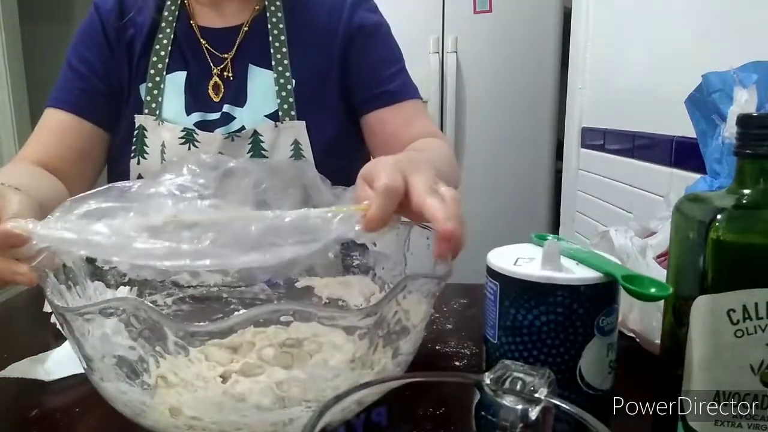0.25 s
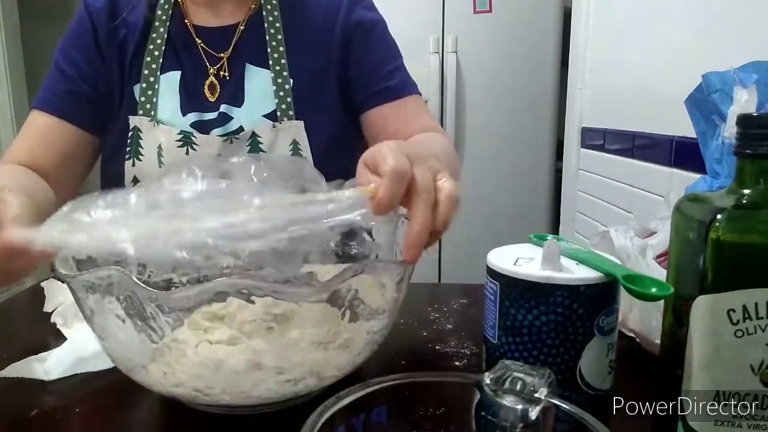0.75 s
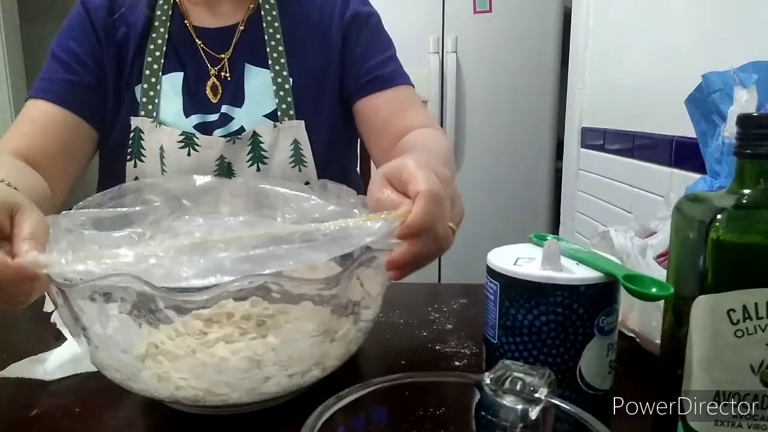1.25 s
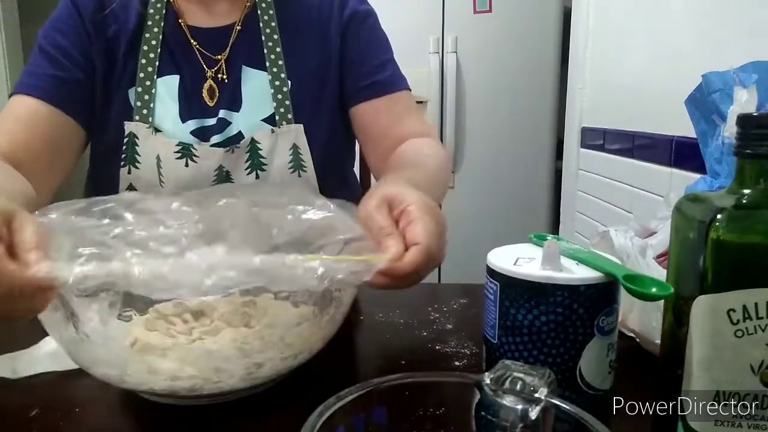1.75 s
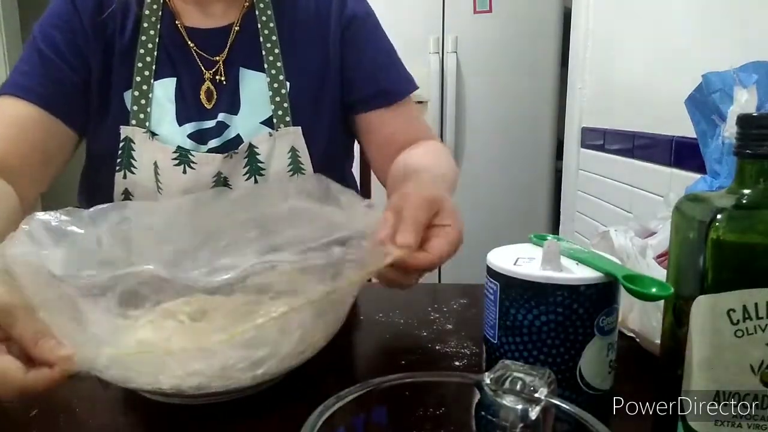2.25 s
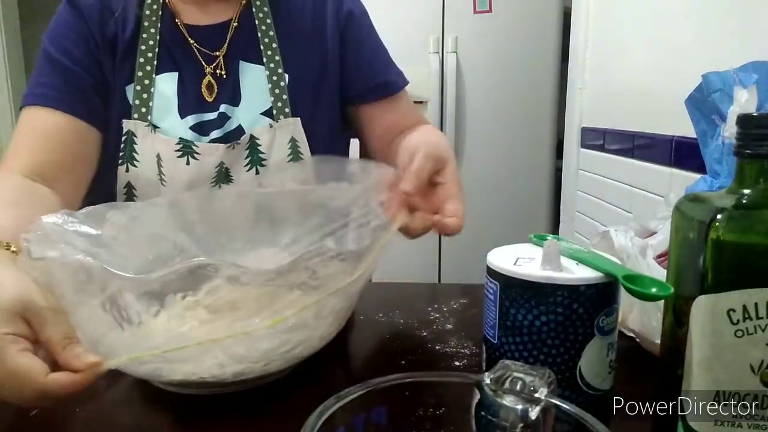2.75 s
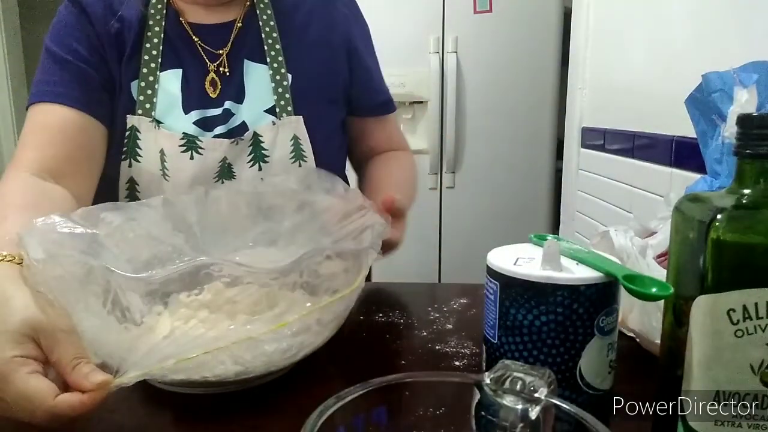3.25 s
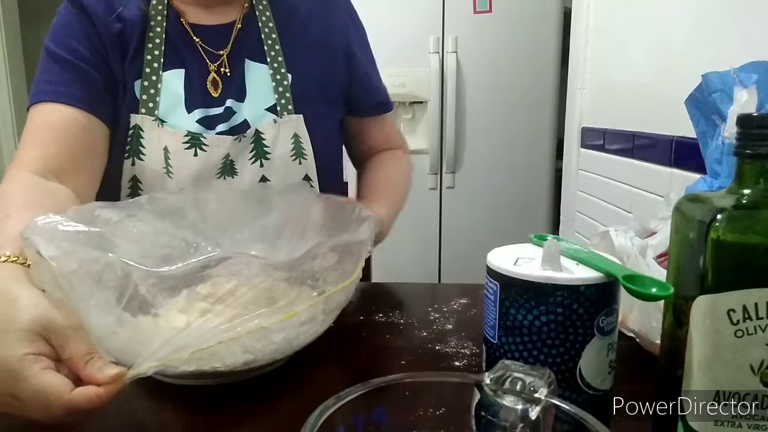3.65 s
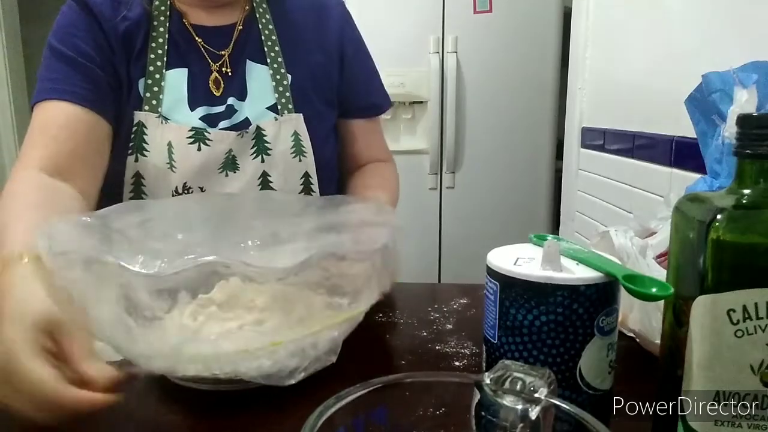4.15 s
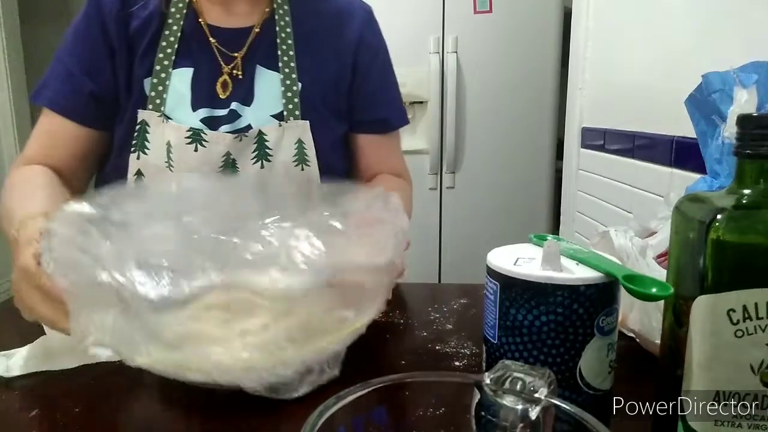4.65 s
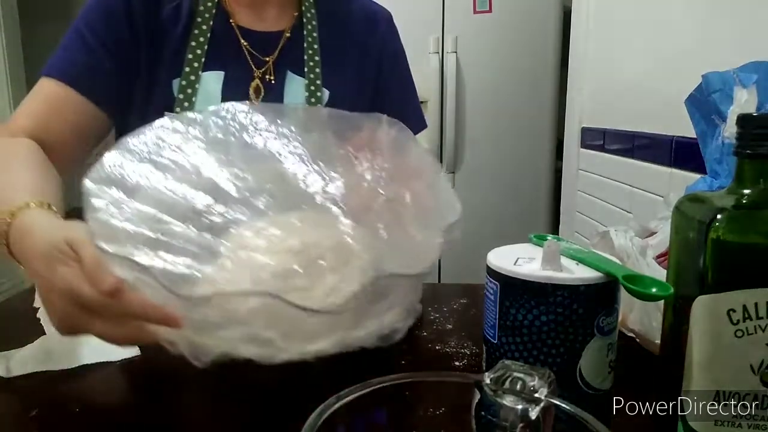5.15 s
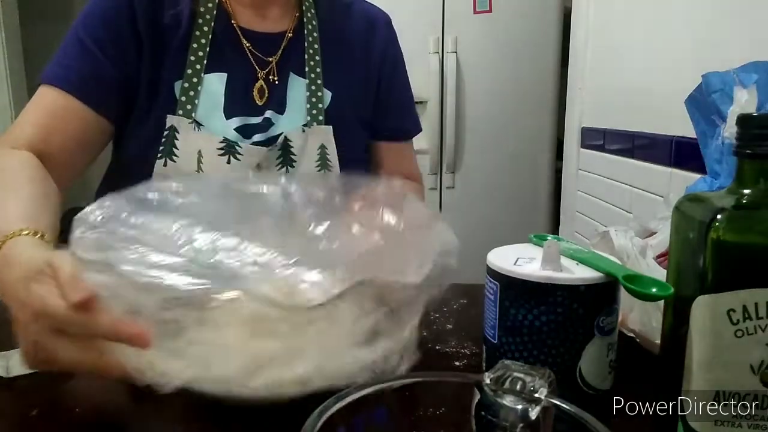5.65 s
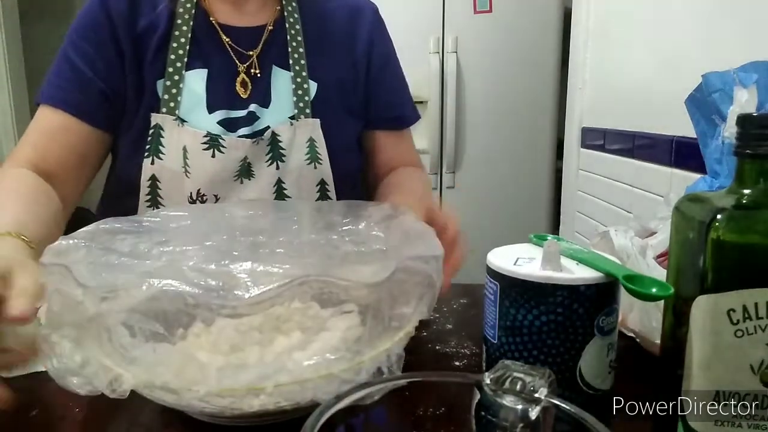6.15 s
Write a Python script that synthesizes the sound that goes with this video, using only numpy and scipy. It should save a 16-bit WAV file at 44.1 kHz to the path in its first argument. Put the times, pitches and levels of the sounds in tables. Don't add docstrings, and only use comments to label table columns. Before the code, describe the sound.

Thin plastic film crinkles and snaps as it is stretched over a glass bowl, with table bumps, three booming set-downs and a faint refrigerator hum.

```python
import sys
import numpy as np
from scipy import signal
from scipy.fft import rfft, irfft, next_fast_len
from scipy.io import wavfile
from scipy.ndimage import uniform_filter1d

SR = 44100
rng = np.random.default_rng(int(sys.argv[2]) if len(sys.argv) > 2 else 0)


def to_linear_factor(level_db):
    exponent = np.asarray(level_db, float) / 20
    return 10 ** exponent


def to_wav(s):
    ch = np.atleast_2d(s).T
    pcm = np.round(np.clip(ch, -1, 1) * 32767)
    wavfile.write(sys.argv[1], SR, pcm.astype(np.int16))


N = 282681
SIZE = next_fast_len(N + SR)
HZ = np.maximum(np.fft.rfftfreq(SIZE, 1 / SR), 1)
BOOM_HZ = 122.9


def rms_one(x):
    return x / np.sqrt(np.mean(x ** 2) + 1e-20)


def in_time(rows):
    s, *columns = np.transpose(rows)
    return [np.interp(np.arange(N) / SR, s, c) for c in columns]


def at_hz(points, hz):
    table_hz, values = np.transpose(points)
    return np.interp(np.log(hz), np.log(table_hz), values)


def colour(x, spectrum):
    shaped = rfft(x, SIZE) * to_linear_factor(at_hz(spectrum, HZ))
    return rms_one(irfft(shaped, SIZE)[..., :N])


def band(x, low_hz, high_hz):
    edges = [low_hz, min(high_hz, 0.45 * SR)]
    return signal.sosfilt(signal.butter(2, edges, "band", fs=SR, output="sos"), x)


def drift(rate_hz):
    r = np.exp(-2 * np.pi * rate_hz / SR)
    return rms_one(signal.lfilter([1], [1, -2 * r, r * r], rng.standard_normal(N + SR))[SR:])


def ring(clicks, hz, t60):
    r, w = to_linear_factor(-60 / (t60 * SR)), 2 * np.pi * hz / SR
    return signal.lfilter([0, np.sin(w)], [1, -2 * r * np.cos(w), r * r], clicks + 1e-18)


def grains(per_s, spread_db, clump_db, clump_hz):
    sizes = to_linear_factor(spread_db * np.minimum(rng.exponential(1, N), 5))
    signs = rng.choice([-1, 1], (2, N))
    happens = rng.random(N) < per_s / SR
    return sizes * signs * happens * to_linear_factor(clump_db * drift(clump_hz))


def add(track, s, sound):
    i = round(s * SR)
    track[..., i:i + sound.shape[-1]] += sound[..., :N - i]


def burst(sound, rise_s, t60):
    t = np.arange(sound.shape[-1]) / SR
    return sound * np.minimum(t / rise_s, 1) * to_linear_factor(-60 * t / t60)


def summed(*levels_db):
    return 10 * np.log10(sum(to_linear_factor(2 * np.maximum(db, -200)) for db in levels_db))


def swell(s, db, rise_s, fall_s):
    t = np.arange(0, N, 32) / SR - s
    return db - 10 * np.where(t < 0, -t / max(rise_s, 0.002), t / max(fall_s, 0.002))


# (f/Hz, t60/s)
ROOM_DECAY = [(100, 0.21), (500, 0.32), (2000, 0.63), (6000, 0.18), (15000, 0.21)]


def tail(wet_db):
    t, out = np.arange(SR // 2) / SR, 0
    for low in 60 * 2.0 ** np.arange(8):
        dying = band(rng.standard_normal(len(t)), low, 2 * low) * np.minimum(t / 0.004, 1)
        dying = dying * to_linear_factor(-60 * t / at_hz(ROOM_DECAY, 1.4 * low))
        out = out + dying / np.sqrt(np.sum(dying ** 2)) * np.sqrt(low / SR * 2)
    return rfft(to_linear_factor(wet_db) * out, SIZE)


# (f/Hz, level/dB per Hz)
RUMBLE_SPECTRUM = [(30, -24), (60, 10.5), (120, -5), (230, 1), (400, -2), (520, -15), (700, -49.5),
                   (3000, -51), (8000, -65), (11500, -48.5), (15500, -54)]


def room_rumble(rub_db):
    rumble_db = summed(-60, rub_db - 16)
    return to_linear_factor(rumble_db + 4.5 + 1.3 * drift(2.8)) * colour(rng.standard_normal((2, N)), RUMBLE_SPECTRUM)


# (t/s, level/dB)
HUM_LEVEL = [(0, -65.5), (.3, -61), (.6, -64), (1.25, -62), (1.6, -64.5), (2.8, -62.5), (3.1, -59.5),
             (3.98, -62.5), (4.39, -66), (4.64, -60), (5.7, -61.5), (6.41, -59.5)]
# (f/Hz, level/dB under the hum)
CABINET_TONES = [(226, -16.5), (240, -18), (290, -15), (343, -16.5)]


def fridge():
    hum_hz = 113.1
    hum_db, = in_time(HUM_LEVEL)
    phase = 2 * np.pi * np.cumsum(hum_hz + 0.6 * drift(3.0)) / SR
    hum = np.sqrt(2) * np.sin(phase) * to_linear_factor(hum_db + 14.0 + 1.2 * drift(9.3))
    for hz, db in CABINET_TONES:
        hum = hum + np.sin(phase * hz / hum_hz) * to_linear_factor(hum_db + 13.5 + db + 3.0 * drift(5.7))
    return hum


# (t/s, level/dB, f/Hz, t60/s)
TABLE_BOOMS = [
    (1.1218, -19.5, 123.7, 0.54),
    (5.836, -17, 123.9, 0.68),
    (6.0594, -21, 124, 0.47),
]


def booms():
    out, t = np.zeros(N), np.arange(SR // 2) / SR
    thump = to_linear_factor(8) * burst(np.sin(2 * np.pi * 133.4 * t), 0.012, 0.09)
    for s, db, hz, t60 in TABLE_BOOMS:
        add(out, s, to_linear_factor(db) * (burst(np.sin(2 * np.pi * hz * t), 0.011, t60) + thump))
    return out


def rubbed_boom(rub_db):
    return to_linear_factor(rub_db - 7.5) * rms_one(ring(rng.standard_normal(N), BOOM_HZ, 0.3))


# (f/Hz, t60/s, level/dB in the first, second, third set-down)
TABLE_MODES = [(150.16, .15, -7, -4, -26), (190.4, 0.12, -7, -4, -8), (210, 0.27, -11, 3, -14),
               (287.7, 0.28, -11, -8, -6), (330, .3, -14, -20, -12), (344, 0.14, -6, -6.5, -5),
               (381, 0.2, -12.5, -11.5, -11), (431, .06, -7, -13, 6), (463, 0.071, 0.5, -9, 0),
               (492, 0.028, 3, -4, -3), (540, 0.27, -7, -15, -12), (590, 0.12, -12, -4, -4),
               (700, 0.27, -19, -19, -15), (793, 0.085, -11, -22, -27), (856, 0.19, -13, -22, -17),
               (885, 0.15, -16.5, -20, -12), (942, 0.1, -10.5, -30, -14), (1070, 0.21, -18, -26, -12),
               (1206, 0.11, -28, -31, -33), (1540, 0.11, -19.5, -31, -30), (2530, .2, -20, -29, -25),
               (3000, .25, -23, -31, -21), (3360, 0.16, -13, -31, -38)]


def rubbing(rub_db):
    clicks, rubbed = grains(900, 4.67, 2.6, 22)[0], 0
    for hz, t60, *_ in TABLE_MODES:
        if 150 < hz < 1300:
            rubbed = ring(clicks, hz, 0.36 * t60) * to_linear_factor(-7 * np.log2(hz / 200)) - rubbed
    return to_linear_factor(rub_db + 0.5) * rms_one(rubbed)


# (t/s, blow level/dB, contact hardness f/Hz, crack level/dB)
SET_DOWNS = [
    [(1.117, -15, 870, -17), (1.116, -45, 980, -15.5), (1.1255, -48.5, 700, -22.5)],
    [(5.8346, -17, 900, -25), (5.846, -34, 496, -43), (5.9, -41, 503, -55)],
    [(6.0538, -17.5, 800, -25), (6.0527, -43, 710, -28), (6.07, -41, 510, -40), (6.11, -37, 650, -55)],
]
# (low edge f/Hz, level/dB, t60/s)
CLATTER_BANDS = [(196, -16.5, 0.4), (406, -15, 0.28), (812, -21.5, 0.25), (1606, -26.5, 0.14),
                 (3190, -46, .12)]


def set_downs():
    out, blows = np.zeros(N), np.zeros((len(SET_DOWNS), N))
    for blow, contacts in zip(blows, SET_DOWNS):
        for s, db, hard_hz, crack_db in contacts:
            push = np.hanning(max(round(SR / hard_hz), 3))
            add(blow, s, to_linear_factor(db) * push / push.sum())
            crack = rms_one(band(rng.standard_normal(1500), 1300, 3230))
            add(out, s, to_linear_factor(crack_db) * burst(crack, 0.0008, 0.01))
            for hz, level_db, t60 in CLATTER_BANDS:
                clatter = rms_one(band(rng.standard_normal(SR // 3), hz, 2 * hz))
                add(out, s, to_linear_factor(db + level_db + 1.5) * burst(clatter, 0.5 / hz, t60))
    for hz, t60, *strength_db in TABLE_MODES:
        out += ring(to_linear_factor(strength_db) @ blows, hz, t60)
    return out


# (t/s, peak level/dB, pitch f/Hz, table boom level/dB)
SOFT_BUMPS = [(0.022, -45.5, 452, -15), (0.785, -44.5, 463, -0.5), (1.798, -48, 503, -2),
              (2.174, -38.5, 518, -32), (2.21, -41, 252, -24), (2.353, -36, 271, -14),
              (2.54, -32, 437, -10.5), (3.005, -31, 452, -14), (3.04, -26.5, 557, -32),
              (3.256, -39, 447, -14), (3.406, -38.5, 397, -25), (3.461, -43, 466, -19),
              (3.49, -35.5, 392, -10), (3.508, -26.5, 474, -10), (3.716, -38.5, 600, -12),
              (3.754, -33, 408, -8.5), (3.948, -37, 450, -8.5), (4.319, -39, 590, -38),
              (5.602, -53, 520, -11)]


def thuds():
    out, t = np.zeros(N), np.arange(9000) / SR
    boom = burst(np.sin(2 * np.pi * BOOM_HZ * t), 0.01, 0.34)
    for s, db, hz, boom_db in SOFT_BUMPS:
        tone = np.sin(2 * np.pi * hz * t)
        tone += 0.26 * np.sin(2 * np.pi * 0.99 * hz * t)
        tone += 0.5 * np.sin(2 * np.pi * 0.608 * hz * t)
        add(out, s, to_linear_factor(db + 6.5) * (burst(tone, 0.0013, 0.047) + to_linear_factor(boom_db + 2.5) * boom))
    return out


# (t/s, peak level/dB, share of its low, middle, high ring level/dB)
JUDDER_HITS = [(0.164, -33, -2.5, -23, -13), (0.222, -31, -23, 0, -19), (0.242, -26.5, -14, -8, -4),
               (0.255, -27.5, -29, -3, -1.5), (0.269, -29.5, -3.5, -2.5, -22),
               (0.285, -27.5, -7.5, -5, -11), (0.338, -27.5, -6, -8, -11), (0.369, -38, -23, 0, -8),
               (0.425, -45.5, -12, -3, 0.5), (0.469, -45.5, 8, -24, -25), (0.485, -35, 0.5, -16, -23)]
# (f/Hz, t60/s)
JUDDER_TONES = [(210, 0.22), (462, 0.12), (725, 0.13)]


def judder():
    out, t = np.zeros(N), np.arange(9000) / SR
    for s, db, *share_db in JUDDER_HITS:
        for (hz, t60), part_db in zip(JUDDER_TONES, share_db):
            add(out, s, to_linear_factor(db + part_db + 1.5) * burst(np.sin(2 * np.pi * hz * t), 0.0028, t60))
    return out


# (t/s, steady crinkle level/dB, slackness as broad folds over fine creases level/dB)
STEADY_WORK = [(0, -63.5, 2.5), (.44, -71.5, 8), (.67, -71, -8.5), (.78, -56.5, 2.5), (1.13, -61, 1),
               (1.22, -55.5, 0.5), (1.96, -59, 0), (2.3, -52.5, -2), (2.55, -51, -8.5), (2.71, -63, -4.5),
               (2.82, -54, -1.5), (3.7, -57, 1), (3.82, -62.5, 5), (3.93, -59, -1.5), (4.41, -63, 2),
               (4.6, -60, 0), (4.8, -63, -12), (4.93, -58.5, -16), (5.03, -60, -9.5), (5.15, -70.5, -9.5),
               (5.3, -94.5, -9)]
# (peak t/s, peak level/dB, rise in s per 10 dB, fall in s per 10 dB)
FILM_TUGS = [(0.019, -55.5, .03, 0.06), (.25, -51.5, 0, 0.07), (.355, -52.5, .12, 0.02),
             (.215, -54, 0.06, .1), (.285, -53.5, 0.04, 0.04), (.688, -66, 0, .3),
             (1.02, -52.5, 0.16, 0.03), (1.62, -56, 0.17, 0), (1.82, -50.5, 0.08, 0.17),
             (2.14, -50, 0.19, 0.39), (2.177, -39.5, 0.01, 0.11), (2.541, -40, 0.0037, 0.02),
             (3.0, -49.5, 0.13, 0.44), (3.07, -40, 0, 0.01), (3.272, -47, 0.11, 0.01),
             (3.499, -46.5, 0.02, 0.05), (3.65, -54.5, -0.46, 0.14), (3.718, -47, -0.03, 0.03),
             (4.121, -44.5, 0.15, 0.1436), (4.302, -36.5, .008, 0.0057), (4.325, -44.5, 0.02, 0.0554),
             (4.462, -53.5, -0.03, 0.13), (4.55, -53.5, 0.02, 0.05), (4.749, -53, 0.3, 0.1),
             (5.345, -72.5, .01, -0.04), (5.392, -71.5, -0.03, 0.02), (5.555, -76.5, -0.02, 0.0354),
             (5.64, -67, -0.08, -0.5), (5.709, -59, 0.07, 0.11), (5.84, -64, -0.28, 0.08),
             (6.155, -61, 0.04, 0.23), (6.19, -55, 0.0268, 0.04), (6.23, -50, 0.042, 0.1),
             (6.301, -49.5, -0.35, 0.02), (6.33, -66, .01, 0.12)]
# (peak t/s, peak level/dB, rise in s per 10 dB, fall in s per 10 dB)
BOWL_DRAGS = [(.1, -55.5, 0.5, 0.3), (.25, -40, 0.09, 0.19), (.36, -54, 0.3, 0.13),
              (.785, -47.5, 0.14, 0.2), (1.09, -47, 0.08, 0.13), (1.16, -35, 0, 0.006),
              (1.2, -47, 0.04, 0.26), (1.85, -60, 0.5, 4), (2.16, -45, 0.07, -0.02), (2.33, -49, 0.07, 0.5),
              (2.551, -39.5, -0.1, 0.06), (2.8, -51.5, 0.2, 0.6), (3.039, -36, -0.03, 0.08),
              (3.28, -42.5, 0.07, 0.04), (3.5, -37.5, 0.02, 0.11), (3.73, -41.5, -0.15, 0.1),
              (4.14, -44.5, 0.05, 0.11), (4.38, -53.5, -1, 0.6), (4.78, -56, -0.5, 0.07),
              (4.97, -57, .1, .1), (5.71, -49, 0.13, 0), (5.86, -44.5, 0.05, 0.2), (6.06, -55, -0.1, 0.3),
              (6.299, -50, -0.14, 0.3)]


def handling():
    work_db, slack_db = np.array(in_time(STEADY_WORK))[:, ::32]
    tugs = [swell(*row) for row in FILM_TUGS]
    folds = [tug - 0.36 * max(row[1] + 51.5, 0) for tug, row in zip(tugs, FILM_TUGS)]
    shakes = [swell(s + 0.028, db - 33.5, 0.015, 0.066) for (s, db, *_), *_ in SET_DOWNS]
    crinkle_db = summed(work_db, *tugs)
    folds_db = summed(work_db + slack_db, *folds, *shakes) - crinkle_db
    rub_db = summed(*[swell(*row) for row in BOWL_DRAGS])
    return [np.interp(np.arange(N), np.arange(0, N, 32), db) for db in (crinkle_db, folds_db, rub_db)]


# (t/s, level/dB, low f/Hz, high f/Hz, t60/s)
LOOSE_FLAPS = [
    (5.3025, -59, 2800, 4200, 0.08),
    (5.335, -66, 2820, 3720, 0.21),
    (5.388, -69, 5200, 5700, .2),
    (5.585, -60, 885, 944, 0.69),
    (5.6, -60.5, 500, 1105, 0.24),
    (5.6, -75, 2920, 3700, .5),
    (4.33, -42.5, 970, 1290, 0.46),
]


def flaps():
    out = np.zeros((2, N))
    for s, db, low_hz, high_hz, t60 in LOOSE_FLAPS:
        even, ragged = rng.standard_normal((2, 2, 11000))
        crackle = rms_one(band(even * to_linear_factor(2.9 * ragged), low_hz, high_hz))
        add(out, s, to_linear_factor(db) * burst(crackle, 0.0011, t60))
    return out


# (t/s, level/dB, f/Hz, length in s)
FILM_SQUEAKS = [
    (2.245, -34, 2880, 0.012),
    (5.201, -70, 930, 0.046),
    (5.322, -71, 918, 0.03),
]


def squeaks():
    out = np.zeros(N)
    for s, db, hz, length_s in FILM_SQUEAKS:
        t = np.arange(round(length_s * SR)) / SR
        add(out, s, to_linear_factor(db) * np.sin(2 * np.pi * hz * t) * np.sin(np.pi * t / length_s) ** 0.5)
    return out


def patchy(x, low_hz, patchy_db):
    edges = low_hz * 2 ** np.arange(0, 3.1, 0.6)
    parts = [band(x, low, high) for low, high in zip(edges, edges[1:])]
    return x + sum(part * (to_linear_factor(patchy_db * drift(14)) - 1) for part in parts)


# (f/Hz, level/dB per Hz)
FINE_CREASES = [(2500, -3), (4000, -1.5), (6000, -3.5), (8500, -9), (10000, -5.5), (11500, 2.5),
                (13500, -5.5), (15500, -5)]
# (f/Hz, level/dB per Hz)
BROAD_FOLDS = [(300, 9.5), (700, 4), (1300, -3), (2000, 2), (2800, -2), (3800, -5.5), (5000, -9),
               (7000, -24.5)]


def crinkle(crinkle_db, folds_db):
    fine = patchy(colour(grains(4000, 2.3, 2.2, 40), FINE_CREASES), 1990, patchy_db=2.5)
    broad = patchy(colour(grains(4000, 1.6, 1.8, 23), BROAD_FOLDS), 498, patchy_db=2.5)
    clicks, dealt = grains(800, 1.9, 2.9, 21.5), rng.integers(0, 12, N)
    pops = 0
    for k, hz in enumerate(np.geomspace(2400, 12500, 12)):
        pops = pops + ring(clicks * (dealt == k), hz, 14 / hz) * np.sqrt(hz)
    out = to_linear_factor(crinkle_db + 6.0) * fine
    out += to_linear_factor(crinkle_db + folds_db + 5.5) * broad
    return out + to_linear_factor(crinkle_db - 4.0) * rms_one(pops)


# (t/s, peak level/dB, low share level/dB, middle share level/dB)
FILM_SNAPS = [(0.018, -27, -14.5, -17), (0.244, -22.5, -2.5, -28), (0.285, -35, 9, -10),
              (1.01, -26, -13, -27), (1.624, -26.5, -10, -9), (1.9345, -27, -11, -9.5),
              (2.174, -18.5, -14, -6), (2.353, -24, -6.5, -23.5), (2.4235, -25.5, -8.5, -8),
              (2.5388, -17, -8, -41.5), (2.9927, -23.5, -5, -18), (3.0418, -23, -3, -6),
              (3.494, -24, -13, -8), (3.511, -32, 9, -5), (3.717, -30, -20, -10), (4.299, -23, -11.5, -6),
              (4.321, -12, -6, -41), (4.4603, -31, -1.5, -3), (5.301, -66, -20, 11),
              (5.3896, -49, -14.5, -17), (6.297, -27.5, -15, -20)]
# (t/s, peak level/dB)
CREASE_TICKS = [(0.4995, -39), (0.5103, -35.5), (0.686, -34), (0.761, -35), (0.817, -28), (1.283, -34),
                (1.3287, -31), (1.526, -28), (2.6275, -26.5), (3.189, -27), (3.259, -22), (3.6486, -36),
                (4.6751, -30), (4.7504, -31), (4.997, -31.5), (5.0574, -27), (5.082, -31), (5.14, -41.5),
                (6.161, -32), (6.166, -38), (6.186, -27), (6.191, -30.5), (6.379, -40), (.519, -44),
                (.55, -41), (.59, -42), (.604, -51), (.752, -39), (.773, -36), (.9585, -41), (1.203, -33),
                (1.335, -31), (1.4274, -39), (1.7617, -36), (1.7866, -33), (1.825, -27), (2.0071, -33),
                (2.0954, -30), (2.1538, -26), (2.487, -27.5), (2.5125, -28), (2.459, -29), (2.7968, -35.5),
                (2.8764, -34), (2.963, -26), (3.3366, -37), (3.396, -34), (3.475, -29), (3.9138, -35.5),
                (3.9457, -32), (4.0101, -33), (4.1118, -29.5), (4.511, -40), (4.7409, -33), (4.946, -33),
                (5.0675, -33), (5.335, -47), (5.562, -50.5), (5.63, -46), (5.668, -45),
                (.191, -38), (.2094, -34), (.2683, -31), (.6649, -47), (.9672, -33), (1.7389, -39),
              (2.7302, -35), (2.7776, -37), (3.487, -26), (3.8322, -39), (4.0706, -33), (4.432, -36),
              (4.8224, -39), (4.8923, -35), (5.5438, -59), (5.6875, -40)]


def snaps_and_ticks():
    out, white = np.zeros((2, N)), rng.standard_normal((2, N))
    low, middle = rms_one(band(white, 700, 2800)), rms_one(band(white, 2500, 5130))
    high = rms_one(band(colour(white, FINE_CREASES), 4000, 20000))
    events = [(*row, 0.017) for row in FILM_SNAPS]
    events += [(s, db, -22.5, -17, 0.011) for s, db in CREASE_TICKS]
    for s, db, low_db, middle_db, t60 in events:
        part = slice(round(s * SR), round(s * SR) + 1500)
        crack = high[:, part] + to_linear_factor(low_db + 3.0) * low[:, part] + to_linear_factor(middle_db + 5.0) * middle[:, part]
        add(out, s, to_linear_factor(db - 5) * burst(crack, t60 / 16.2, t60))
    return out


def film(crinkle_db, folds_db):
    return crinkle(crinkle_db, folds_db) + snaps_and_ticks() + squeaks() + flaps()


# (f/Hz, level/dB)
FAR_PORT_TONE = [(60, -5), (1300, -5), (2400, -5), (4400, -7), (8100, -8.5), (10000, -10.5), (12000, -26.5),
                 (15000, -25.5)]
# (f/Hz, share from 0 to 1)
PORT_LIKENESS = [(30, 0.45), (60, 0.73), (110, 0.95), (300, 0.99), (500, .99), (1200, 0.91), (2100, 0.76),
                 (4000, 0.68), (6500, 0.47), (15000, 0.37)]
# (f/Hz, time sooner in s)
FAR_LEAD = [(70, 0), (110, -.00013), (160, -.0002), (230, -.00004), (320, .00001), (3000, -.00001),
            (5000, .000014)]


def scene():
    crinkle_db, folds_db, rub_db = handling()
    room = 1 + tail(-9.5)
    wood = -rfft(rubbing(rub_db) + set_downs() + thuds() + judder(), SIZE)
    solid = wood * room + rfft(fridge() + rubbed_boom(rub_db) - booms(), SIZE)
    spread, other = rfft(film(crinkle_db, folds_db), SIZE) * room + rfft(room_rumble(rub_db), SIZE)
    alike = np.clip(at_hz(PORT_LIKENESS, HZ), 0, 1)
    unlike = np.sqrt(1 - alike ** 2)
    own_echoes = (alike - 1) * room + unlike * tail(-0.98)
    far = solid + wood * own_echoes + alike * spread + unlike * other
    far = far * to_linear_factor(at_hz(FAR_PORT_TONE, HZ))
    lag_s = 21.2 / 44100 - at_hz(FAR_LEAD, HZ)
    far = -far * np.exp(-2j * np.pi * HZ * lag_s)
    return irfft(np.array([solid + spread, far]), SIZE)[:, :N]


def blocks(power):
    _, bins, frames = power.shape
    tiles = uniform_filter1d(uniform_filter1d(power, 4, axis=1, origin=-2), 4, axis=2, origin=-2)
    return tiles[:, np.arange(bins) // 4 * 4][:, :, np.arange(frames) // 4 * 4]


# (f/Hz, level/dB)
QUIET_LIMIT = [(600, -88), (1250, -84), (2300, -96), (4000, -104), (9000, -104), (11000, -110)]


def band_dropout(x, depth_db, masked_db, hole_db, loud_db):
    sum_and_difference = np.array([x[0] + x[1], x[0] - x[1]]) / 2
    hz, _, cells = signal.stft(sum_and_difference, SR, nperseg=1024)
    limit_db = at_hz(QUIET_LIMIT, hz + 1)[:, None]
    power = np.abs(cells) ** 2
    smooth = uniform_filter1d(uniform_filter1d(power, 4, axis=1), 5, axis=2)
    level_db = 10 * np.log10(np.maximum(smooth, 1e-20))
    under = 0.5 - 0.5 * np.tanh((level_db - limit_db) / 2)
    keep = to_linear_factor(depth_db * under)
    tile_db = 10 * np.log10(blocks(power) + 1e-20)
    hidden = (tile_db[1] - tile_db[0] > masked_db) & (tile_db[1] < loud_db)
    keep[0][hidden & (np.abs(hz - 2110) < 240)[:, None]] = 0.01
    luck = rng.standard_normal(cells.shape)[:, np.arange(len(hz)) // 4]
    luck = luck[:, :, np.arange(cells.shape[2]) // 8]
    keep[tile_db < limit_db + hole_db + 7 * luck] = 0.08
    keep[:, hz < 600] = 1
    keep[:, hz > 15480] = 0
    mid, side = signal.istft(cells * keep, SR, nperseg=1024)[1][:, :N]
    return np.array([mid + side, mid - side])


def low_pass(x):
    return signal.sosfilt(signal.butter(12, 16460, fs=SR, output="sos"), x)


def record(dry):
    hiss = to_linear_factor(-80.5 + 3.5 * drift(9)) * rms_one(band(rng.standard_normal(N), 10750, 11300))
    heard = dry + hiss * [[1], [0]]
    mix = signal.sosfilt(signal.butter(3, 86, "high", fs=SR, output="sos"), heard)
    mix = band_dropout(mix, depth_db=-7.0, masked_db=6.5, hole_db=-10.5, loud_db=-59)
    return low_pass(mix)


dry = scene()
out = record(dry)
to_wav(out)
```